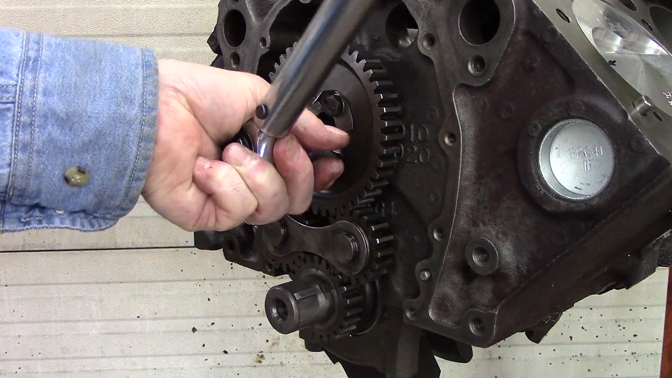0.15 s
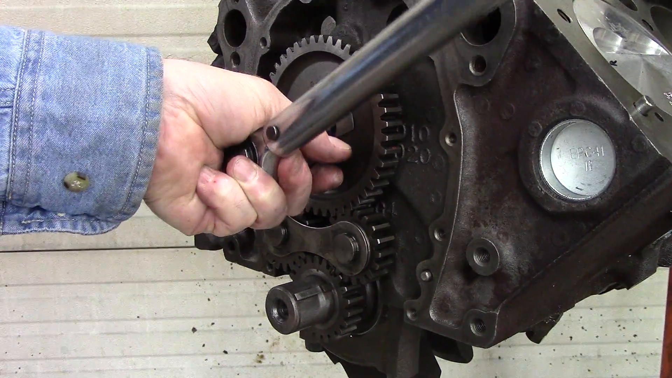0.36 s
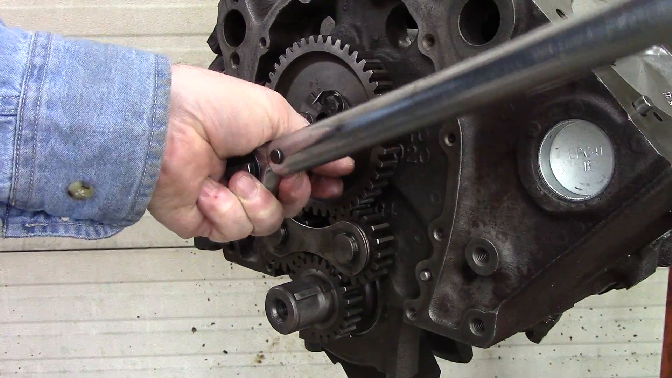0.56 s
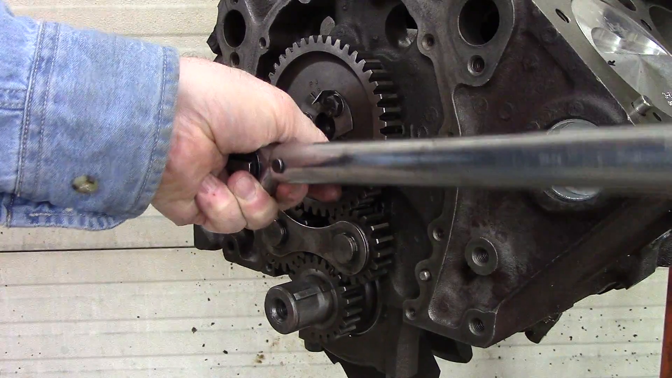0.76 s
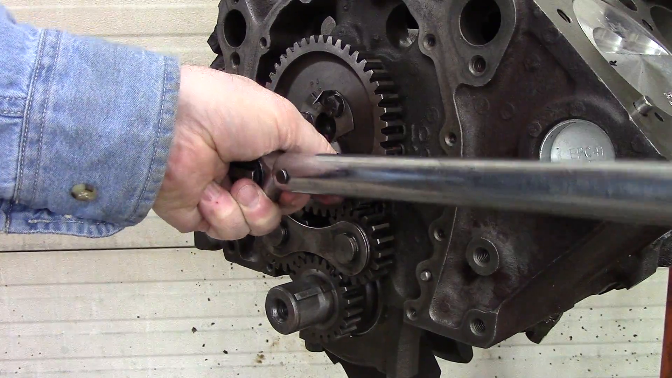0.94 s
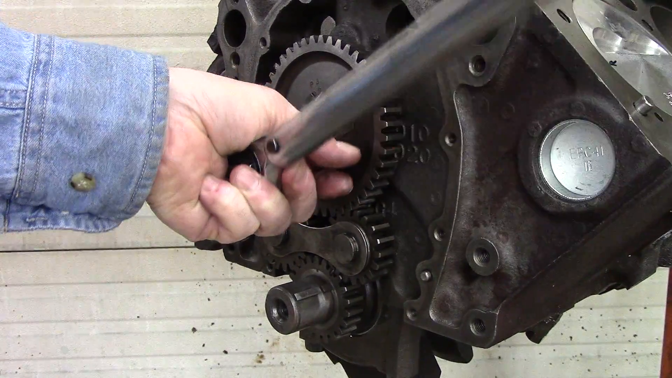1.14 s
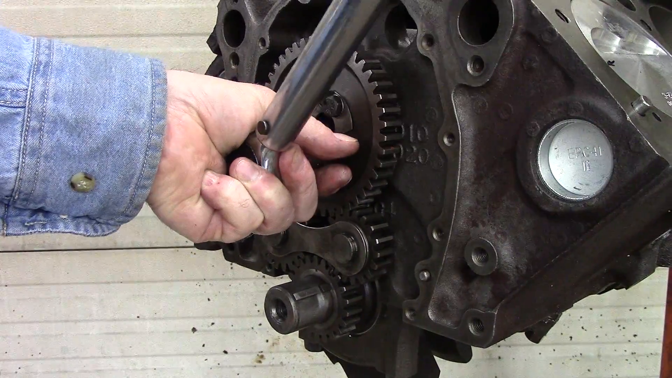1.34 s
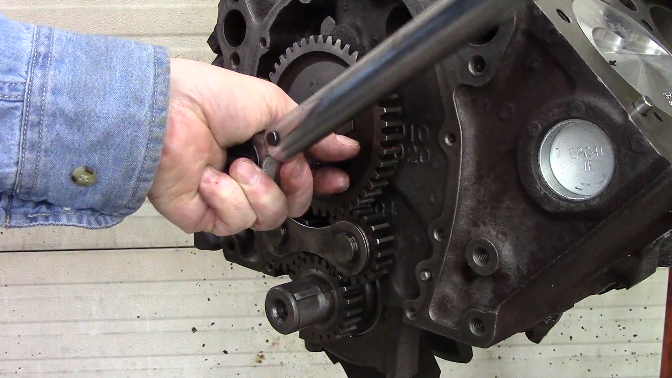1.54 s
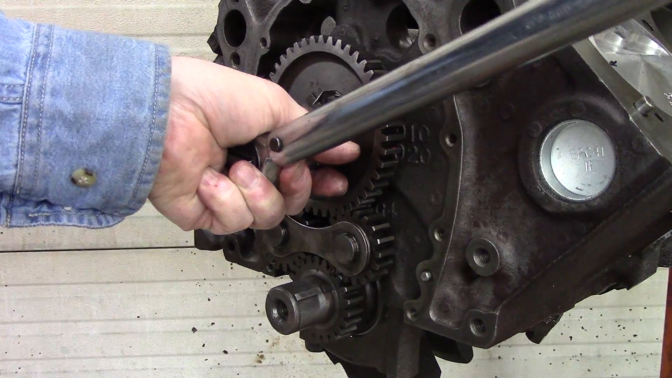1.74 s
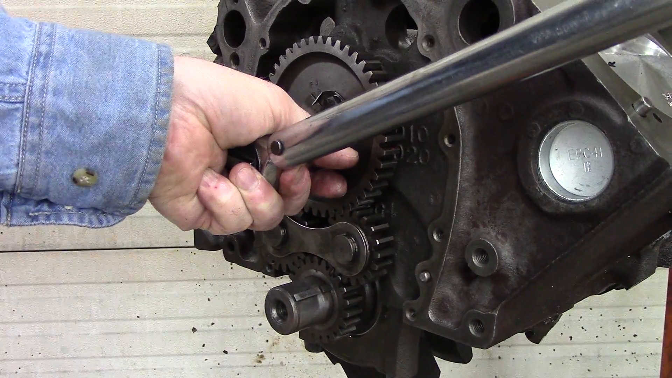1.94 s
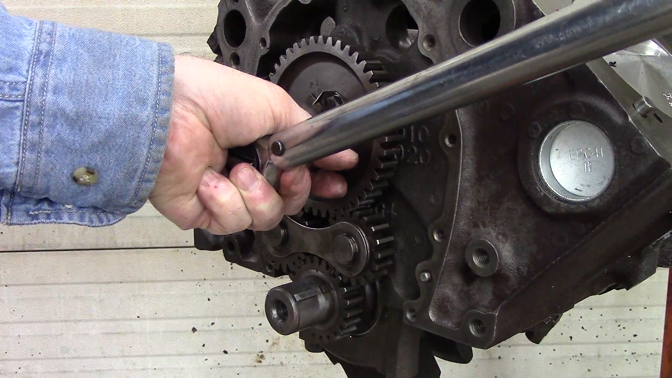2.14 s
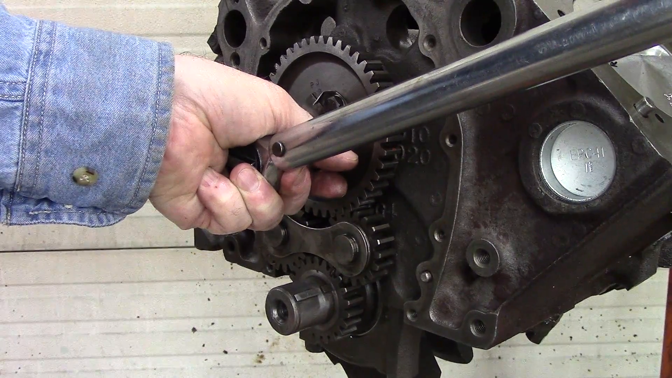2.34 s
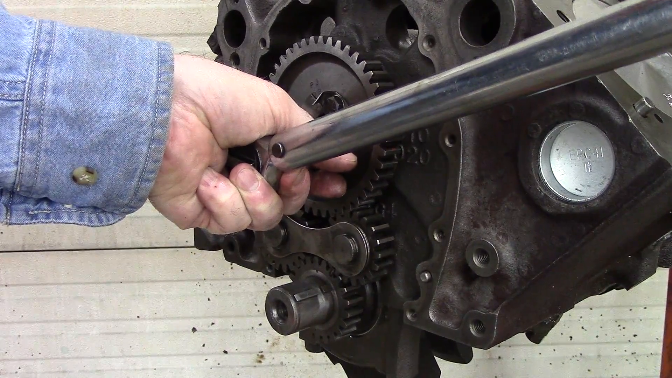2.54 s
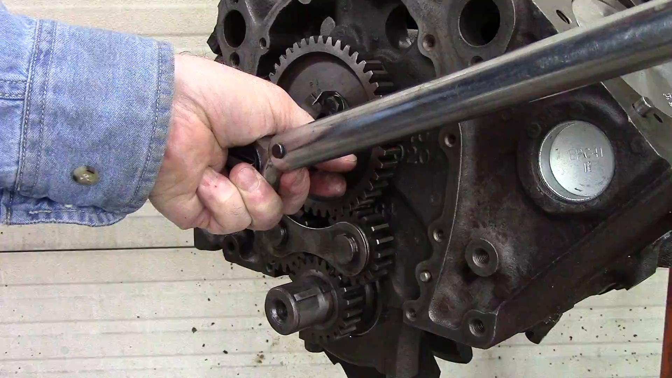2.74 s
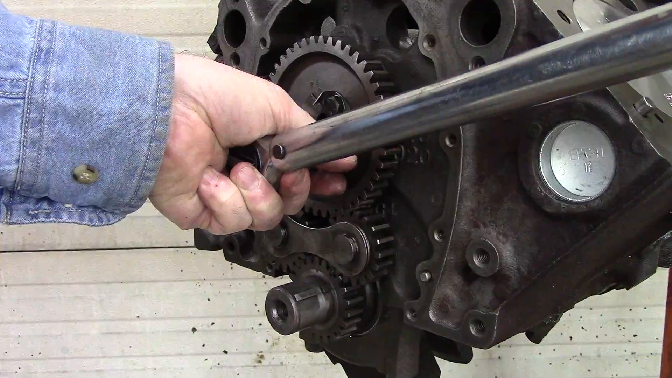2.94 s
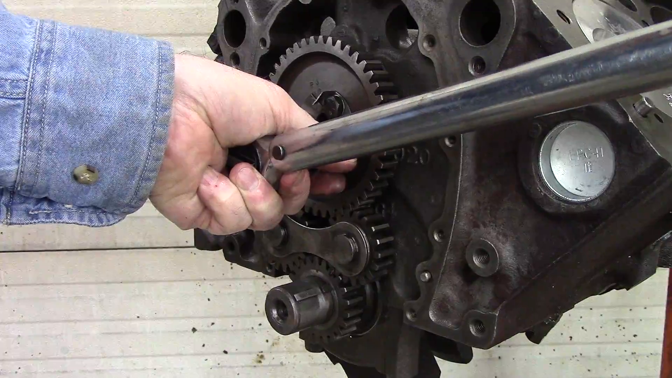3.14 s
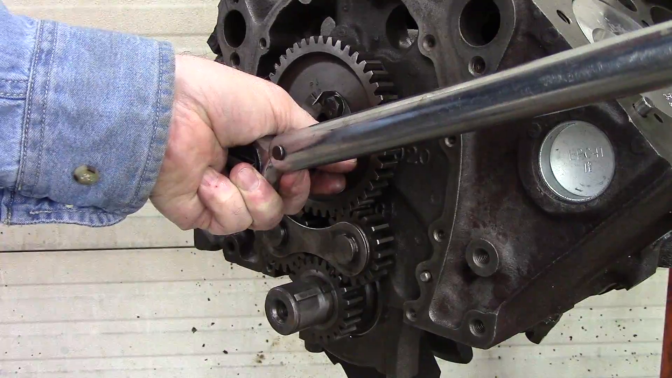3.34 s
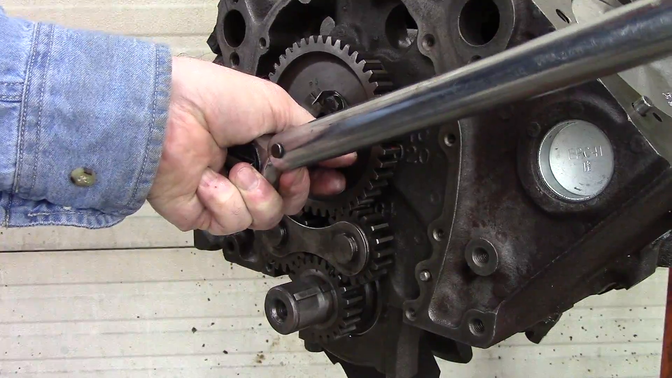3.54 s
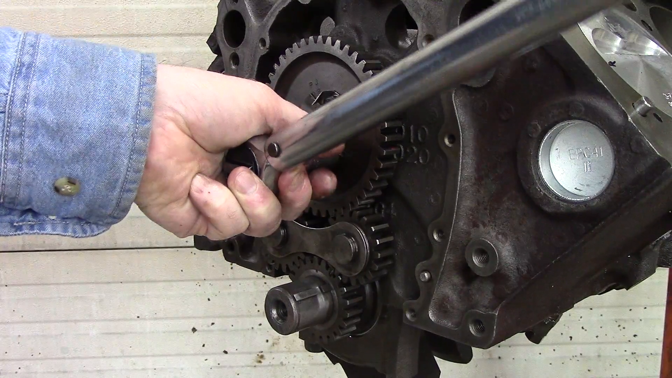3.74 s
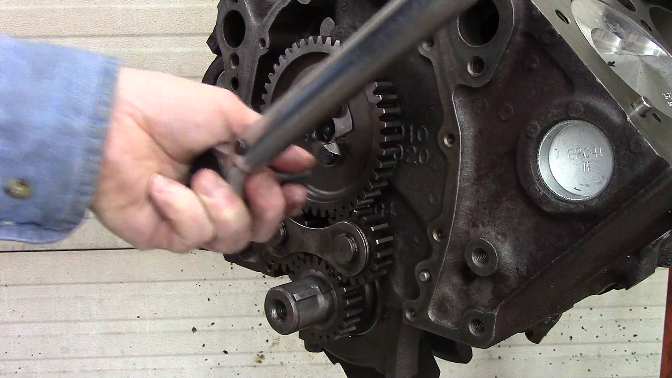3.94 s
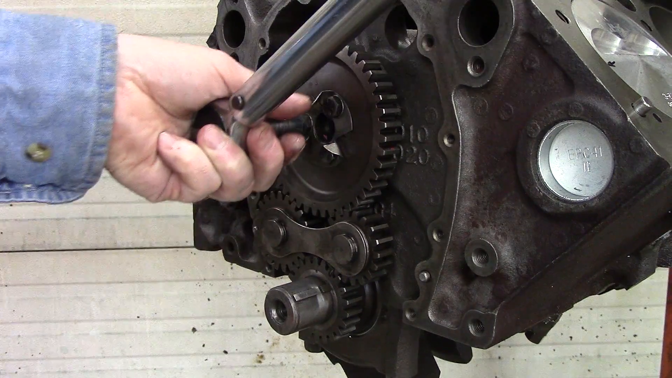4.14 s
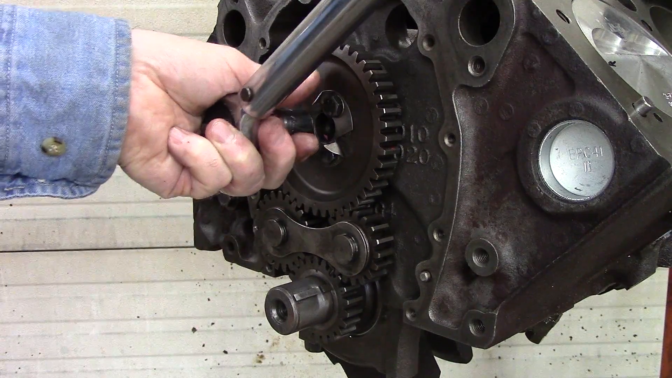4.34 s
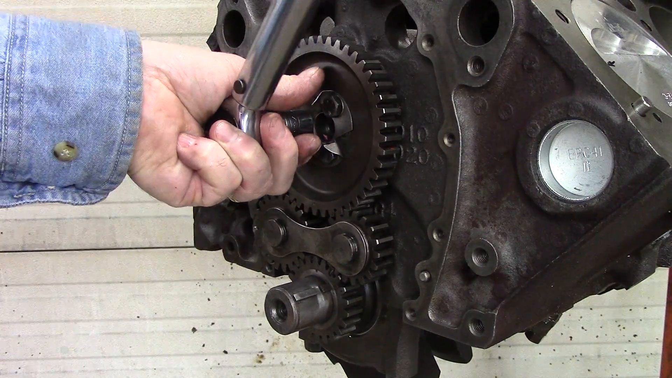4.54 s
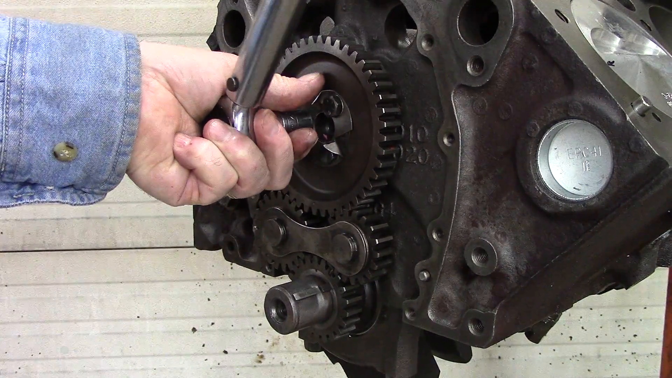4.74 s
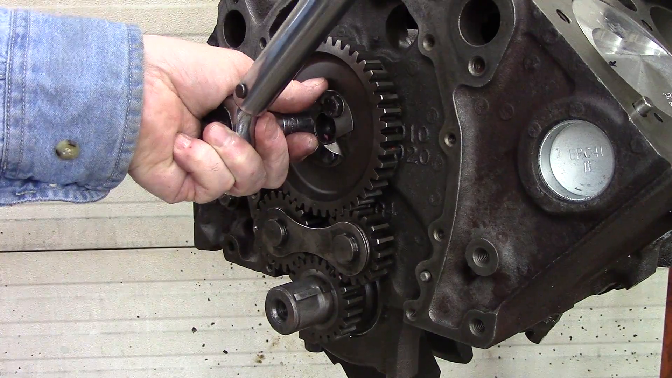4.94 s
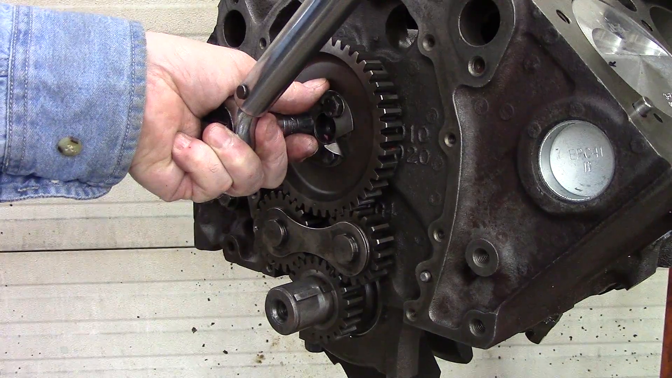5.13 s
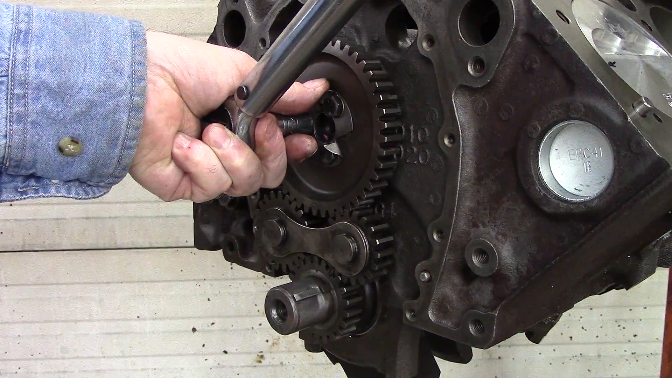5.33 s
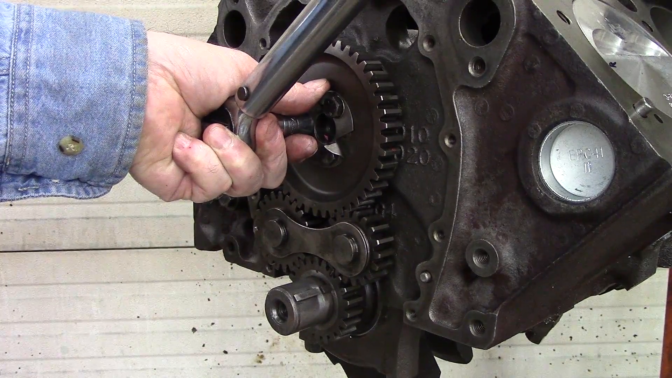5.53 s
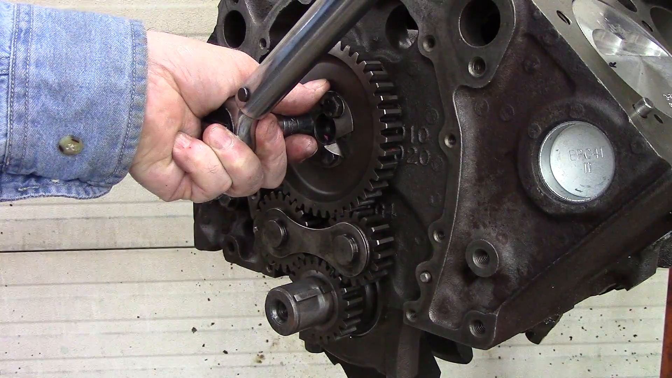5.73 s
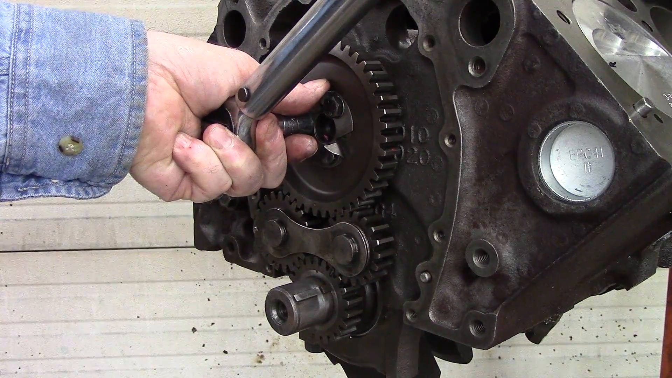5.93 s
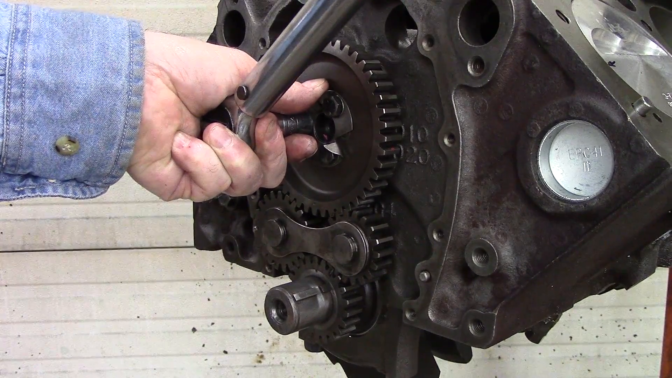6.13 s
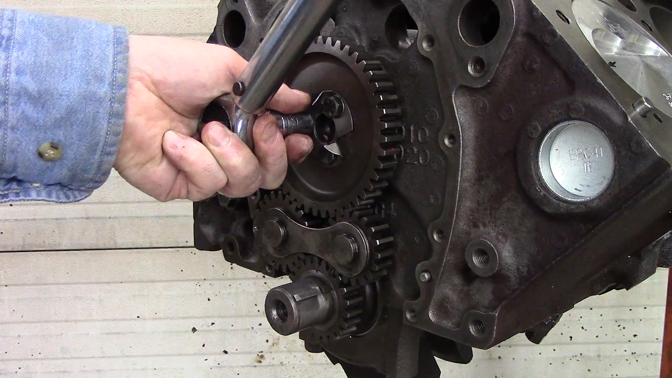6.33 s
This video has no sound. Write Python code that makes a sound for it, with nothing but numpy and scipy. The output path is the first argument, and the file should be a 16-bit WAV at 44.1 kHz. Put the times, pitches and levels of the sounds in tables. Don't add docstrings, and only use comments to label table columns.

```python
import sys
import numpy as np
from scipy import signal
from scipy.fft import rfft, irfft
from scipy.io import wavfile

SR = 44100
rng = np.random.default_rng(int(sys.argv[2]) if len(sys.argv) > 2 else 0)


def undo_db(level):
    steps = np.asarray(level, float) / 20
    return 10 ** steps


def inscribe(sig):
    pcm = np.round(np.clip(np.atleast_2d(sig).T, -1, 1) * 32767)
    wavfile.write(sys.argv[1], SR, pcm.astype(np.int16))


N = 285768


def rms_one(x):
    return x / np.sqrt(np.mean(x ** 2) + 1e-20)


def at_hz(points, hz, column=1):
    points = np.array(points)
    return np.interp(np.log(hz), np.log(points[:, 0]), points[:, column])


def add(track, s, sound):
    i = round(s * SR)
    track[i:i + len(sound)] += sound[:N - i]


def left_right(mid, side):
    return np.array([mid + side, mid - side])


def bandpass(x, low_hz, high_hz):
    return signal.sosfilt(signal.butter(2, [low_hz, high_hz], "band", fs=SR, output="sos"), x)


def air():
    # (frequency [Hz], density [dB per Hz])
    colour_points = [(15, -96.5), (25, -29.5), (80, -8), (280, -4.5), (510, -7.5), (2670, -18.5),
                     (6000, -23.5), (16000, -36.5)]
    # (frequency [Hz], left-right likeness [0-1])
    likeness = [(30, .55), (80, 0.8), (290, 0.6), (640, 0.6), (1400, 0.8), (3100, 0.7), (6800, 0.8),
                (15000, 1)]
    # (frequency [Hz], level [dB], width [Hz])
    hum_lines = [(122.1, -81.5, 3.4), (170, -76, 10), (240, -76.5, 23), (361.5, -67.5, 8),
                 (1600, -77.5, 69)]
    hz = np.maximum(np.arange(N // 2 + 1) * SR / N, 1)
    alike = np.clip(at_hz(likeness, hz), 0, 1)
    mid, side, motor = rfft(rng.standard_normal((3, N)))
    channels = left_right(np.sqrt(1 + alike) * mid, np.sqrt(1 - alike) * side)
    noise = rms_one(irfft(undo_db(at_hz(colour_points, hz)) * channels, N))
    hum = 0
    for line_hz, db, width in hum_lines:
        resonance = 1 / (1 + ((hz - line_hz) / width) ** 2)
        hum = hum + undo_db(db) * rms_one(irfft(motor * resonance, N))
    return undo_db(-57.5 - 0.9) * noise + hum


def pulsed_tones():
    # (start [s], end [s], level [dB])
    phrases = [
        (0, .33, -72.5),
        (.64, 1.63, -72.5),
        (2.07, 2.23, -73.5),
        (2.44, 2.68, -70.5),
        (2.89, 3.04, -70.5),
        (3.28, 4.05, -71.5),
        (4.2, 4.93, -73),
        (5.14, 6.48, -73),
    ]
    near_hz, far_hz = 5562, 5572
    long_s, short_s, short_after_s, far_chirp_s = .058, .037, .086, .036
    near, far, t = np.zeros(N), np.zeros(N), np.arange(N) / SR
    for pair in np.arange(.0548, N / SR, .1502):
        for s, length in (pair, long_s), (pair + short_after_s, short_s):
            db = [db for start, end, db in phrases if start <= s and s + length / 2 < end]
            if db:
                add(near, s, undo_db(db[0] + 4.0) * signal.windows.tukey(round(length * SR), .35))
    for s in np.arange(.0251, N / SR, .09025):
        add(far, s, undo_db(-75 + 4.0) * signal.windows.tukey(round(far_chirp_s * SR), .35))
    return near * np.sin(2 * np.pi * near_hz * t) + far * np.sin(2 * np.pi * far_hz * t)


def all_contacts():
    # (time [s], socket level [dB], socket pitch [Hz],
    # wrench head over socket [dB], pawl over socket [dB])
    clicks = [
        (0.2546, -36, 3000, -4, 0.5),
        (0.7346, -36.5, 2300, -1.7, -3.5),
        (1.1312, -28.5, 3140, -5, -21),
        (3.146, -32, 2770, -2.5, -7.5),
        (3.476, -47.5, 2810, 7.5, -1),
        (3.4884, -19, 3043, -4.5, -8.5),
        (4.211, -20.5, 4220, -6.5, -5),
        (4.3896, -26.5, 2900, 6.5, -4),
        (6.1131, -53.5, 2360, 12.5, 4),
        (6.1232, -15, 3280, -7.5, -10),
    ]
    # (time [s], socket level [dB], socket pitch [Hz], block thud over socket [dB])
    nudges = [(0.4686, -50.5, 2830, 2.5), (0.519, -52.5, 2930, -1.5), (1.0227, -55.5, 1870, 0.5),
              (1.0406, -46.5, 2500, -7.5), (1.092, -59, 2410, 2), (1.5438, -58.5, 2950, 1.5),
              (1.6703, -51.5, 3050, -2.5), (3.88, -57, 1970, -2.5), (4.0238, -54.5, 2560, 0),
              (4.3104, -45.5, 2730, -7), (4.3431, -47.5, 2310, -5), (4.921, -45, 2680, 3),
              (6.3413, -59, 3320, 6.5)]
    # (time [s], socket level [dB], socket pitch [Hz], wrench head over socket [dB])
    taps = [(0.7387, -27.5, 2630, -6.5), (1.1515, -36.5, 3390, -10.5), (1.1993, -28, 2486, -32),
            (1.2626, -30, 2450, -18), (1.519, -58.5, 2900, -5), (1.697, -63, 2650, -2),
            (3.15, -52.5, 2010, 1), (3.492, -37.5, 3300, -6), (3.8947, -32, 3040, -11),
            (3.992, -60, 2980, -12), (4.1955, -47.5, 3990, -26), (4.41, -30.5, 3270, -4),
            (4.644, -45.5, 2680, -17), (4.797, -66, 1910, 1), (4.8381, -54, 2760, -4.5)]
    seatings = [
        (0.744, -14, 2960, -0.5, -3),
        (3.6709, -38, 2655, -2.5, -11),
        (3.891, -29.5, 2600, -8.5, -11),
        (4.17, -38, 2683, -8, -4.5),
        (4.4067, -22, 2536, -5.5, -4.5),
        (5.7236, -34.5, 3010, -5, -16),
    ]
    # (time [s], pawl level [dB], socket pitch [Hz], socket over pawl [dB])
    snaps = [
        (1.0498, -57, 2780, -16),
        (1.15, -13, 2980, -20.5),
        (1.2131, -12.5, 2050, -25),
        (1.2708, -16, 2870, -17),
        (4.5623, -14, 2615, -19),
        (4.6476, -20, 2630, -15),
        (4.7734, -60, 2760, -4),
        (5.1276, -58, 1925, -21.5),
    ]
    rows = [(s, db - 18.5, db, db + head, db + pawl, hz) for s, db, hz, head, pawl in clicks]
    rows += [(s, db + thud, db, db - 15.5, db - 22, hz) for s, db, hz, thud in nudges]
    rows += [(s, db - 17, db, db + head, db + head - 0.5, hz) for s, db, hz, head in taps]
    rows += [(s, db - 6.5, db, db + head, db + pawl, hz) for s, db, hz, head, pawl in seatings]
    rows += [(s, db - 36.5, db + socket, db - 8.5, db, hz) for s, db, hz, socket in snaps]
    return sorted(rows)


def struck(contact):
    # (frequency [Hz], level [dB], decay time [ms])
    block = [(410, -11, 2.1), (780, 6.5, 0.49), (1128, -7.5, 1.8), (1537, 0.5, 1.4)]
    head = [(4240, 1.2, 0.44), (4976, 0.53, 1), (6000, 0.5, 0.71), (6870, 1.5, 0.5)]
    pawl = [(8480, 7, .4), (9530, 5.5, 0.48), (10480, -0.5, 0.5), (12000, -0.5, .3), (13600, -7.5, 0.33),
            (15200, -15.5, .25)]
    # (ratio to its pitch [1], level [dB], decay time [ms])
    socket = [(.72, -2, 0.73), (1.001, 7.5, 0.84), (1.27, -2.5, 0.93)]
    s, block_db, socket_db, head_db, pawl_db, socket_hz = contact
    modes = [(hz, db + block_db, ms) for hz, db, ms in block]
    modes += [(ratio * socket_hz, db + socket_db, ms) for ratio, db, ms in socket]
    modes += [(hz, db + head_db, ms) for hz, db, ms in head]
    modes += [(hz, db + pawl_db, ms) for hz, db, ms in pawl]
    hz, db, ms = np.transpose(modes)[:, :, None]
    return hz, db, ms / 1000


def contacts(scatter, aside_db):
    out, t = np.zeros((2, N)), np.arange(900) / SR
    rows = all_contacts()
    luck = rng.standard_normal((len(rows), 4, 17, 1))
    for contact, (detune, spread, turn, place) in zip(rows, luck):
        hz, db, decay = struck(contact)
        rise = 1 - np.exp(-(t / (0.00024 + 0.35 * np.minimum(decay, .001))) ** 2)
        fall = np.exp(-t / decay) + .015 * np.exp(-t / decay / 6)
        level = undo_db(db + 9.0 + 1.6 * spread)
        sines = level * rise * fall * np.sin(2 * np.pi * hz * (1 + scatter * detune) * t + 3 * turn)
        start = contact[0] - .0004
        add(out[0], start, sines.sum(0))
        add(out[1], start, undo_db(aside_db) * (place * sines).sum(0))
    return out


def rings():
    # (frequency [Hz], level [dB], t60 [s])
    collar, handle, bar = [(5905, -3.5, .054), (6640, -4, .038), (10460, 0.5, 0.04), (10900, -14.5, 0.23),
                           (13400, -17, .076), (14460, -23.5, .08)], [(10610, 0, .12)], [(930, -2.5, 0.18), (2950, -9, 0.15),
                                                           (3870, -5, 0.3), (4050, -1, .12),
                                                           (6250, -7, 0.21), (6500, -10, 0.18),
                                                           (6750, -8, 0.17), (12000, -3, 0.054)]
    drive, gear, stand = [(2230, 0, .13)], [(738.5, -10.5, 0.056), (793, -5, 0.1), (845, -11.5, 0.078),
                                         (8300, -12.5, .06), (8600, -8.5, .06)], [(210, -6, .035), (333, 0, .3)]
    # (time [s], level [dB])
    collar_blows = [
        (0.2547, -37.5),
    ]
    handle_blows = [
        (0.746, -36.5),
        (1.697, -68),
        (3.1458, -45),
        (3.4878, -62),
        (4.6476, -51),
        (4.921, -62),
        (6.1231, -65),
    ]
    bar_blows = [
        (3.1458, -47),
    ]
    drive_blows = [
        (3.1458, -49),
        (5.7232, -50),
    ]
    gear_blows = [
        (3.4878, -36),
        (4.2105, -39.5),
        (6.1231, -32.5),
    ]
    stand_blows = [
        (.744, -44),
        (3.4876, -56),
        (6.1225, -52.5),
    ]
    # (time [s], frequency [Hz], level [dB], t60 [s])
    odd_rings = [
        (.75, 3140, -25, 0.014),
        (1.2127, 1900, -36, 0.0477),
        (4.172, 11700, -56, .1),
        (5.7232, 11100, -62, 0.11),
    ]
    parts = [(collar, collar_blows), (handle, handle_blows), (bar, bar_blows),
             (drive, drive_blows), (gear, gear_blows), (stand, stand_blows)]
    rows = list(odd_rings)
    for modes, blows in parts:
        rows += [(s, hz, db + blow_db, t60) for hz, db, t60 in modes for s, blow_db in blows]
    out = np.zeros(N)
    for (s, hz, db, t60), apart in zip(rows, rng.uniform(9.3, 98, (len(rows), 2, 1))):
        t = np.arange(round(1.2 * t60 * SR)) / SR
        partner_hz = hz + apart * np.sqrt(hz / 3000) * [[1], [-1]]
        partners = np.sin(2 * np.pi * partner_hz * t).sum(0)
        envelope = undo_db(db - 60 * t / t60) * (1 - np.exp(-(t / 0.0011) ** 2))
        add(out, s, envelope * (np.sin(2 * np.pi * hz * t) + .55 * partners))
    return out


def bumps():
    # (time [s], level [dB], low edge [Hz], high edge [Hz], decay time [ms])
    bump_rows = [
        (5.916, -34.5, 354, 630, 7.7),
        (0.37, -55, 2000, 8300, 14),
        (5.914, -42.5, 2000, 5600, 8.4),
        (3.6, -59.5, 2200, 3100, 31),
        (4.173, -46.5, 6800, 14500, 16),
    ]
    out, t = np.zeros(N), np.arange(4000) / SR
    for (s, db, low_hz, high_hz, ms), white in zip(bump_rows, rng.standard_normal((len(bump_rows), 4000))):
        band = rms_one(bandpass(white, low_hz, high_hz))
        add(out, s, undo_db(db) * band * (1 - np.exp(-t / 0.0048)) * np.exp(-t * 1000 / ms))
    return out


def toward_walls(blur):
    out, grid = np.zeros(N), np.arange(257) * SR / 512
    beaming = grid / (grid + 400) / np.sqrt(1 + (grid / 8500) ** 6)
    for contact in all_contacts():
        hz, db, decay = struck(contact)
        shape = 1 / (1 + ((grid - hz) / (blur * hz + 0.13 / decay)) ** 2) ** 2
        peaks = undo_db(db) ** 2 * decay * shape / (blur * hz + 0.49 / decay)
        pulse = np.roll(irfft(np.sqrt(peaks.sum(0)) * beaming * SR), 64)
        add(out, contact[0], pulse)
    return out


def shop(x):
    # (frequency [Hz], t60 [s], echo level [dB], side minus mid [dB])
    room = [(194.9, .5, 7, -43), (485, 0.35, -3, -15.5), (1170, 0.33, -7.5, -23), (2540, 0.54, -20, -18),
            (4650, 0.7, -18, -17.5), (8150, 0.41, -23.5, -11.5), (12000, 0.85, -28.5, -13.5),
            (16000, .45, -18, -14)]
    t = np.arange(SR) / SR
    white, echo = rng.standard_normal((2, 2, SR)), 0
    edges = 200 * 2 ** np.arange(0, 6.6, .5)
    early = (1 + 3.8 * np.exp(-t / 0.004)) * np.clip((t - .0025) / 0.0023, 0, 1)
    for k, (low, high) in enumerate(zip(edges, edges[1:])):
        mid, side = bandpass(white[k % 2], low, high)
        t60, echo_db, side_db = (at_hz(room, np.sqrt(low * high), column=c) for c in range(1, 4))
        fade = undo_db(-60 * t / t60)
        shape = fade / np.sqrt(np.sum(fade ** 2)) * early
        echo = echo + undo_db(echo_db) * shape * left_right(mid, undo_db(side_db) * side)
    return signal.fftconvolve(x[None], echo, axes=1)[:, :N]


def scene():
    chirps, ringing, far = pulsed_tones(), rings(), bumps()
    mid, side = contacts(scatter=.03, aside_db=-21)
    echo = shop(toward_walls(blur=0.15) + undo_db(2.0) * ringing + undo_db(4.5) * far + undo_db(-3.5) * chirps)
    near = left_right(mid + ringing + undo_db(-4.5) * far, side) * undo_db(np.array([[-.25], [.25]]))
    return near + echo + chirps * undo_db(np.array([[-.3], [.3]])) + air()


def top_cut(x):
    return signal.sosfilt(signal.butter(12, 16720, fs=SR, output="sos"), x)


def record(dry):
    rounded = 0.9 * np.tanh(dry / 0.99)
    thin = signal.sosfilt(signal.butter(2, 40, "high", fs=SR, output="sos"), rounded)
    cut = signal.sosfilt(signal.cheby2(12, 70, 17200, fs=SR, output="sos"), thin)
    return top_cut(cut)


dry = scene()
out = record(dry)
inscribe(out)
```